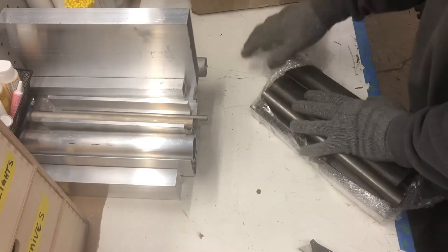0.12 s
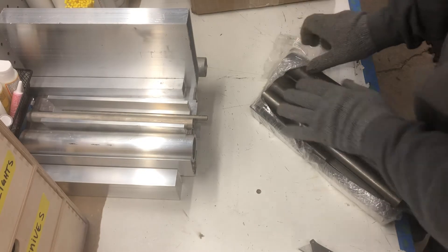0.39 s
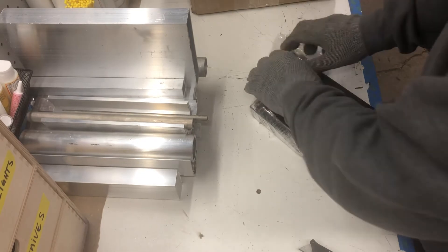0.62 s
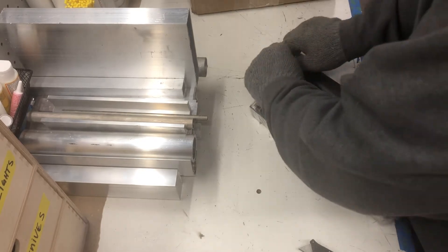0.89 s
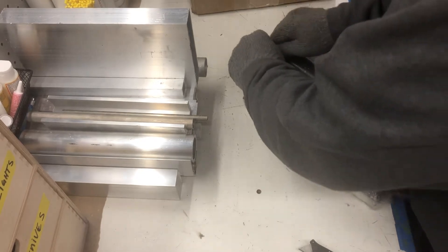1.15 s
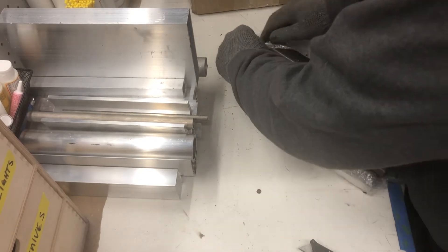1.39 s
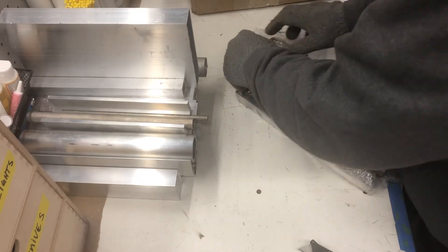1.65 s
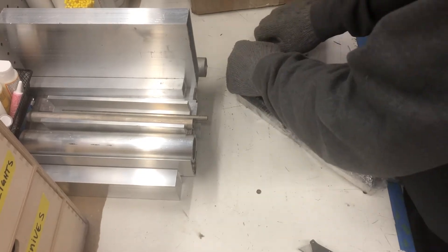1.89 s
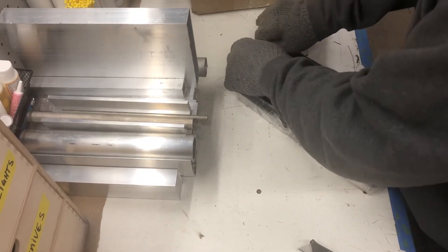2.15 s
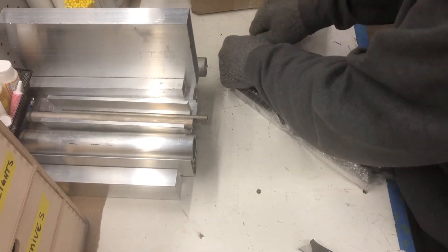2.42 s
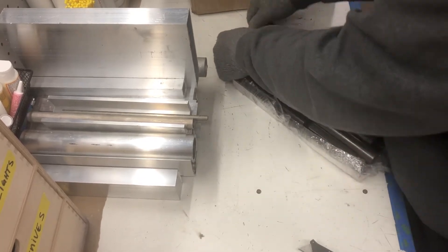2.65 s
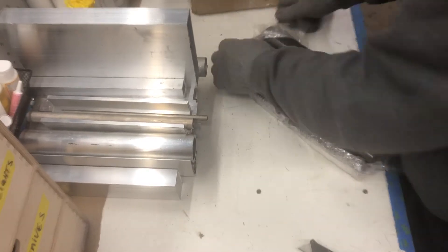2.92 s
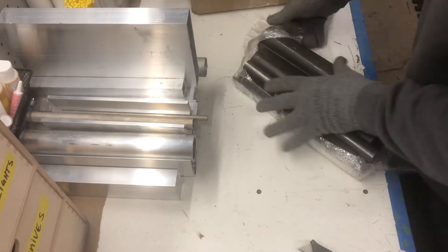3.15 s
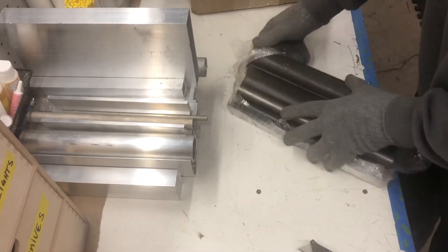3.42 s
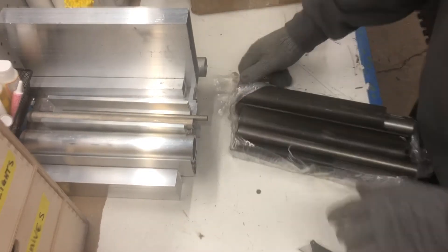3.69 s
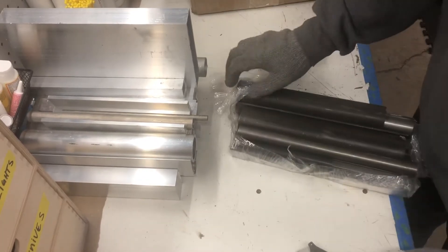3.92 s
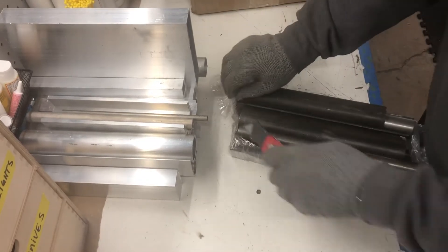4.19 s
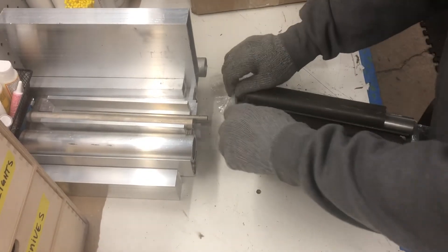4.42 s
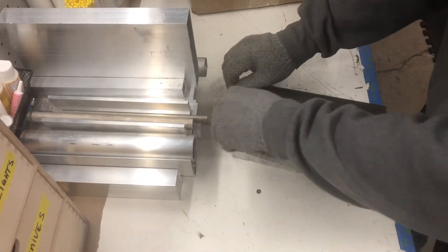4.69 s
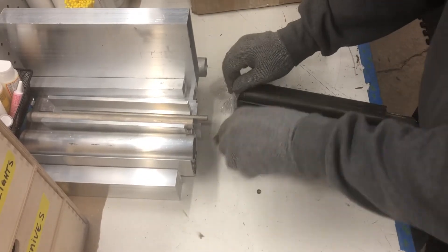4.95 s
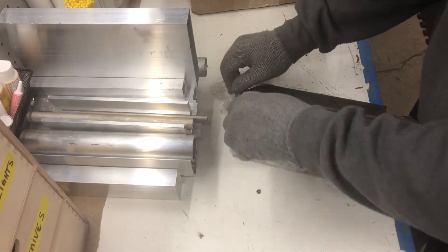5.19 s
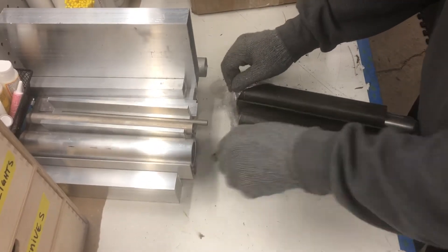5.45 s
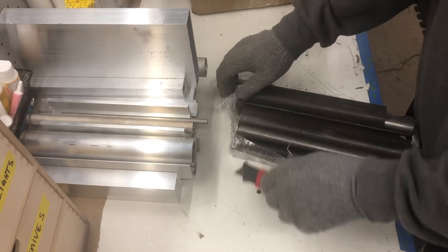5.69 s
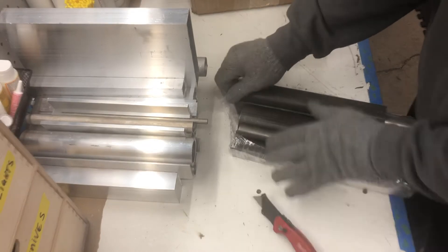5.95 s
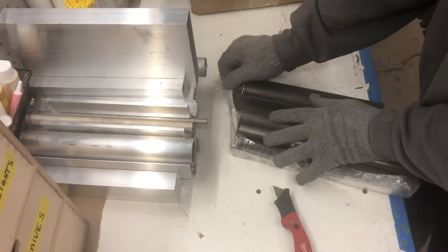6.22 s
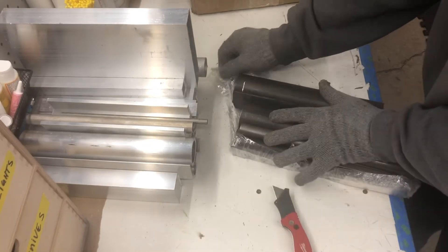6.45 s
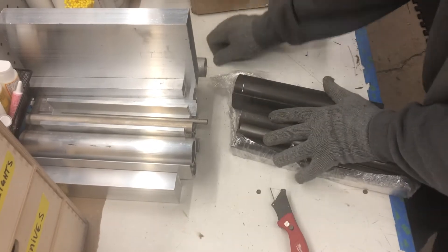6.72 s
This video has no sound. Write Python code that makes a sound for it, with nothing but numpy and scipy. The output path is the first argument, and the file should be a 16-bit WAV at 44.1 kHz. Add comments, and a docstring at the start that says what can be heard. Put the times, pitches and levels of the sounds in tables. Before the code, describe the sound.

Film is tugged in bursts of dry crackle, with ticks and hollow pops from the tubes and knocks on the bench top. After a big snap and a heavy thump, the load slides and judders. A blade scrapes loudly, the knife lands and bounces, then crisp high crackling resumes. Close, thin-sounding small microphone in a small workshop with low background noise.

```python
"""Hands pull stretch wrap off a bundle of steel tubes on a workbench: film crackle and snaps from filtered noise.
Throughout, bumps and slides ring the bench top, and resonant noise and pops stand for the air in the tubes.
Early on a knock rings a held tube; halfway, the bundle is dragged round with a climbing rough resonance.
Then a knife scrapes the steel, brushes a tube, drops, bounces and rocks on the bench with clicks and thuds.
Bright film snaps and rattling tube ends finish it, over a short echo and the low noise of the shop."""
import sys
import numpy as np
from scipy import signal
from scipy.fft import rfft, irfft
from scipy.io import wavfile
from scipy.ndimage import uniform_filter1d

SR = 44100
rng = np.random.default_rng(int(sys.argv[2]) if len(sys.argv) > 2 else 0)


def wav_out(sig):
    """Save sig, one row per channel (or a flat mono array), as 16-bit PCM at SR to the path in sys.argv[1]."""
    wavfile.write(sys.argv[1], SR, np.round(np.clip(np.atleast_2d(sig).T, -1, 1) * 32767).astype(np.int16))


def invert_db(x):
    """Field ratio 10**(x/20) for x, a level in decibels (scalar or array-like)."""
    u = np.asarray(x, float) / 20
    return 10 ** u


N = 301644
T = np.arange(N) / SR

# tugs at the film; the one at 5.949 is mostly the low ring of the knife's blows:
# (full strength at t/s, swell/s, hold/s, crackle level/dB, tube air level/dB)
TUGS = [(0.135, 0.018, 0.16, -47, -56), (0.306, 0.035, 0.067, -50, -50.5), (0.675, 0.013, 0.53, -44, -51),
        (1.32, 0.13, 0.02, -45.5, -49.5), (1.396, 0.045, 0.16, -47, -52.5), (1.958, 0.13, 0.2, -43, -50.5),
        (2.275, 0.11, 0.071, -40.5, -48.5), (2.58, 0.45, 0.051, -44.5, -62),
        (2.864, 0.15, 0.041, -39, -46.5), (3.122, 0.031, 0.054, -48, -48.5),
        (3.323, 0.38, 0.23, -47, -55.5), (3.659, 0.13, 0.14, -48.5, -74), (4.209, 0.022, 0.11, -49.5, -56),
        (4.476, 0.0095, 0.073, -51, -63), (4.602, 0.079, 0.02, -38, -45),
        (4.818, 0.014, 0.011, -37.5, -43.5), (4.919, 0.019, 0.0073, -40.5, -39.5),
        (5.425, .03, 0.2, -48, -48), (5.949, 0.076, 0.15, -51.5, -37.5), (6.14, 0.14, 0.16, -41.5, -52),
        (6.36, 0.076, 0.019, -35.5, -36.5), (6.458, 0.035, 0.024, -47.5, -52),
        (6.652, 0.19, 0.0047, -37, -41)]
# the film creeping between tugs: (t/s, crackle level/dB)
CREEP = [(0, -50.5), (.6, -56.5), (1.7, -54.5), (2.7, -50.5), (3.8, -58), (4.4, -63), (4.75, -50.5),
         (5.2, -62), (5.7, -52.5), (6.45, -51), (6.84, -63)]
# modes of the bench top: (f/Hz, level/dB, t60/s)
BENCH_MODES = [(103.4, -5, 0.074), (153, -4.5, 0.071), (209.4, -3.5, 0.11), (268, -6, 0.1),
               (374, 3.5, 0.059), (439.7, 0, 0.059), (549, -14.5, 0.18), (786, 5, 0.03),
               (1070, -2.5, 0.047)]


def noise():
    """White noise for the whole scene."""
    return rng.standard_normal(N)


def unit(x):
    """Scales a signal to an rms of 1."""
    return x / np.sqrt(np.mean(x ** 2))


def curve(table):
    """Draws straight lines through (t/s, value) points."""
    return np.interp(T, *np.transpose(table))


def colour(x, points, lo_hz=1, hi_hz=SR):
    """Shapes the spectrum along (f/Hz, level/dB) points, between two soft edges."""
    f = np.maximum(np.fft.rfftfreq(N, 1 / SR), 1)
    hz, db = np.transpose(points)
    edges = 1 / np.sqrt((1 + (lo_hz / f) ** 4) * (1 + (f / hi_hz) ** 4))
    tilt = invert_db(np.interp(np.log(f), np.log(hz), db))
    return irfft(rfft(x) * tilt * edges, N)


def ring(x, modes):
    """Decaying modes of alternate sign; a unit tap starts each at its own level."""
    out = 0
    for k, (hz, db, t60) in enumerate(modes):
        turn = 2j * np.pi * min(hz, SR / 2.2) / SR
        decay = np.log(1000) / (max(t60, .001) * SR)
        pole = np.exp(turn - decay)
        out = out + (-1) ** k * invert_db(db) * signal.lfilter([1], [1, -pole], x).imag
    return out


def walk(rate):
    """Random levels held 1 / rate s and slewed; spread 1."""
    k = max(int(SR / rate), 1)
    held = np.repeat(rng.standard_normal(N // 20 + 1), k)[:N]
    return unit(uniform_filter1d(held, k))


def add(out, s, x):
    """Mixes a short sound in at s seconds."""
    i = int(s * SR)
    out[i:i + len(x)] += x[:N - i]


def burst(rise_ms, t60, chance):
    """Noise that swells over the rise and then dies away; peak near 1."""
    t = T[:len(chance)]
    rise = 1 - np.exp(-t / max(rise_ms / 1000, 1e-5))
    shape = rise * np.exp(-np.log(1000) * t / max(t60, .002))
    return chance * shape / shape.max() / 1.86


def patch(chance, rise_ms, t60, hz, cycles):
    """A burst heard through a broad resonance; peak 1."""
    x = ring(burst(rise_ms, t60, chance), [(hz, 0, cycles / hz)])
    return x / np.abs(x).max()


def creases(per_s, spread_db, fade_ms):
    """Loudness of randomly timed buckles of uneven size, each dying within its fade time."""
    size = invert_db(spread_db * np.clip(noise(), -2.5, 2.5)) * (rng.random(N) < per_s / SR)
    return signal.lfilter([1], [1, -np.exp(-1000 / (fade_ms * SR))], size)


def add_push(out, s, db, ms):
    """A smooth shove that lasts as long as the contact."""
    contact = np.hanning(max(int(ms * SR / 1000), 3) + 2)
    add(out, s, invert_db(db) * contact / contact.sum())


def movements(rows, rest_db):
    """Level in dB of movements that swell, sag while held and are let go; their powers add to the rest level."""
    swell_db = 20  # how far a movement climbs during its swell time
    sag_db_per_s, release_db_per_s = 4.5, 212  # the release adds to the sag
    power = invert_db(rest_db) ** 2
    for s, swell, hold, db in rows:
        fall = swell_db * np.maximum(s - T, 0) / max(swell, .005)
        fall = fall + sag_db_per_s * np.maximum(T - s, 0)
        fall = fall + release_db_per_s * np.maximum(T - s - hold, 0)
        power = power + invert_db(db - fall) ** 2
    return 10 * np.log10(power)


def film():
    """Hundreds of creases buckle each second; some are heard in every band, others in one band alone."""
    # spectrum of the crackle: (f/Hz, level/dB per Hz)
    film_tone = [(200, -42), (700, -8), (1200, 1), (3900, -1), (7000, -4.5), (16000, -10)]
    # treble of the film against its body: (t/s, level/dB)
    treble = [(0, 0), (.6, -2.5), (1.4, 1), (2.0, -3.5), (3.1, 1.5), (4.4, 6.5), (4.65, 3), (5.1, -4),
              (5.8, 3), (6.2, 11.5), (6.45, -3), (6.7, 7.5)]
    level_db = movements([tug[:4] for tug in TUGS], curve(CREEP))
    bright_db = curve(treble)
    shared = unit(creases(120, 6, .5) * invert_db(3 * walk(14)))
    gusts = invert_db(2 * walk(18))
    bands = []
    # the last band is open at the top
    for lo_hz, hi_hz in ((200, 1230), (1200, 1370), (2200, 4000), (3800, 6440), (7000, 70000)):
        own = unit(creases(90, 6, .9))
        loud = .45 * shared + .75 * own + .75  # the constant is a steady rustle
        grain = noise() * loud * gusts * invert_db(0.52 * walk(9.2))
        bands.append(colour(grain, film_tone, lo_hz, hi_hz))
    body = sum(bands[:-1]) / np.std(sum(bands[1:-1]))  # levelled without the lowest band
    return invert_db(level_db) * (body + invert_db(bright_db) * unit(bands[-1]))


def snaps():
    """A crease lets go with a broad tick that also shakes the patch of film it frees."""
    # single creases letting go: (t/s, level/dB, pitch f/Hz)
    snap_rows = [(0.679, -30.5, 2200), (0.7284, -24.5, 2550), (0.7612, -30, 3990), (0.9883, -20.5, 2410),
                 (0.998, -20, 3900), (1.2913, -23, 3280), (1.3384, -25, 1590), (1.3625, -14, 1220),
                 (1.9735, -35, 1280), (2.2492, -22, 2160), (2.308, -17.5, 4000), (2.4339, -29, 1660),
                 (2.4997, -31.5, 1300), (2.5699, -6.5, 3300), (2.754, -20.5, 4400), (2.781, -22, 4200),
                 (2.815, -23, 4300), (2.828, -18, 3730), (2.8448, -21, 1570), (2.8636, -14, 2660),
                 (2.897, -19, 884), (3.0914, -27.5, 3570), (3.3715, -17, 5170), (3.9125, -22.5, 3420),
                 (3.9668, -23.5, 4900), (4.105, -28.5, 4580), (4.1814, -29, 4870), (4.2375, -27, 1690),
                 (4.382, -26, 7800), (4.4872, -25.5, 1900), (4.622, -16, 2830), (4.8245, -27.5, 1380),
                 (4.9216, -14.5, 1415), (5.017, -21.5, 2360), (6.1625, -12, 10100), (6.2235, -17, 6100),
                 (6.302, -16, 8000), (6.3768, -15, 1620), (6.5096, -19, 6440), (6.5795, -16, 8000),
                 (6.6455, -12, 10200), (6.6534, -8.5, 6500)]
    flap_cycles, flap_max_s = 39.5, .06  # t60 of the shaking: in cycles, and its upper limit
    tick_top = 4  # a tick dulls above this multiple of its pitch
    out = np.zeros(N)
    for (s, db, hz), chance in zip(snap_rows, rng.standard_normal((len(snap_rows), 2, 3000))):
        tick = burst(.05, .004, chance[0])
        dull = np.exp(-2 * np.pi * min(tick_top * hz, SR / 2) / SR)
        tick = signal.lfilter([np.sqrt(1 - dull ** 2)], [1, -dull], tick)
        flap = patch(chance[1], 0.1, min(flap_cycles / hz, flap_max_s), hz, 14)
        add(out, s, invert_db(db) * (0.58 * tick + 0.58 * flap))
    return out


def bench():
    """Bumps push the bench top into ringing; the sliding bundle shakes it with juddering noise."""
    # bumps on the bench top: the bundle's, and at 6.055 and 6.071 the dropped knife rocking:
    # (t/s, level/dB, contact/ms)
    bumps = [(0.159, -28, 9.2), (0.871, -17, 18), (1.331, -31.5, 3.2), (1.345, -16, 9.5),
             (1.466, -22, 10.4), (2.871, -9, 12.5), (3.693, -21, 7.1), (3.727, -27, 8.4), (3.835, -32, 5.4),
             (4.237, -29.5, 3.8), (4.623, -31, 4.5), (5.015, -34, 2.9), (5.79, -38, 1.6), (6.055, -25, 1.8),
             (6.071, -35, 1.1), (6.557, -36.5, 1.5), (6.651, -31, 1.7)]
    # the bundle sliding: (full strength at t/s, swell/s, hold/s, rumble level/dB)
    slides = [(.15, 0.065, 0.23, -55.5), (.8, 0.08, 1, -52.5), (1.35, 0.076, 0.15, -53),
              (2.5, 0.066, 0.2, -50.5), (2.89, 0.039, 0.012, -40), (3.4, 0.13, 0.023, -40),
              (3.62, 0.23, .12, -40), (3.86, 0.052, 0.092, -51), (4.92, .15, 0.13, -54),
              (5.25, 0.049, 0.2, -48), (5.41, 0.03, 0.11, -34.5), (5.98, 0.29, 0.24, -43),
              (6.2, 0.13, 0.28, -48), (6.57, 0.093, 0.17, -54)]
    push = np.zeros(N)
    for s, db, ms in bumps:
        add_push(push, s, db, ms)
    rumble_db = movements(slides, -67)  # the second figure is the bench at rest
    judder = invert_db(2.5 * walk(20))
    shaken = ring(noise() * judder, BENCH_MODES)
    rub = unit(colour(shaken, [(60, 15.0), (250, 0.0), (700, -4.0), (2000, -18)]))
    return ring(push, BENCH_MODES) + invert_db(rumble_db) * rub


def knife_scrape():
    """The blade catches on steel: each catch is a harsh rasp that drives ringing steel modes."""
    # catches: (t/s, level/dB, t60/s, rasp pitch f/Hz, blade ring level/dB)
    catches = [(5.2332, -10, 0.048, 2420, -14), (5.266, -20, 0.2, 7050, -22), (5.285, -20, 0.94, 3800, -33),
               (5.347, -12.5, 0.16, 2760, -15), (5.395, 6.5, 0.083, 3500, -34),
               (5.409, -2.5, 0.12, 4100, -22), (5.431, 4.5, 0.14, 5250, -33), (5.454, 3, 0.03, 2840, -5),
               (5.465, -5, 0.083, 8000, -12), (5.478, -1.5, 0.086, 7400, -2), (5.489, 1, 0.082, 3560, -34),
               (5.499, -0.5, 0.023, 3100, -27)]
    # modes of the blade: (f/Hz, level/dB, t60/s)
    blade_modes = [(1985, -19, .08), (2449, -16, .09), (2790, -14, .05), (3591, -16, .06), (4905, -15, .05),
                   (5370, -19, .04), (6430, -13, .05), (6967, -7, .07), (7768, -15, .045),
                   (10030, -18, .05), (13570, -13, .07)]
    rasp, drive = np.zeros(N), np.zeros(N)
    for (s, db, t60, hz, ring_db), chance in zip(catches, rng.standard_normal((len(catches), 3, 8000))):
        scratch = burst(0.43, t60, chance[0])
        pitched = patch(chance[2], 0.82, t60, hz, 5.0)
        add(rasp, s, invert_db(db) * (0.5 * scratch + 0.42 * pitched))
        add(drive, s, invert_db(db + ring_db) * burst(2.4, t60, chance[1]) / 10)
    grit = 0.75 + 0.28 * unit(creases(400, 6, 0.99))
    rough = rasp * invert_db(2.3 * walk(300)) * grit
    rasp = colour(rough, [(300, -3), (8000, -3.5), (16000, -4.0)], lo_hz=246)
    return rasp + ring(drive, blade_modes)


def knife_drop():
    """The knife lands and bounces: each blow clicks, rings the handle and thuds on the bench top."""
    # blows: (t/s, click level/dB, thud level/dB, contact/ms)
    blows = [(5.8507, -5, -14.5, 0.9), (5.8676, -15, -14, 2.44), (5.9515, -10.5, -16.5, 1),
             (5.9661, -12, -21.5, 0.46), (5.998, -29, -35, 0.96), (6.0363, -12.5, -25, 1.1)]
    # modes of the handle: (f/Hz, level/dB, t60/s)
    handle_modes = [(1470, 1, 0.0048), (2420, 6.5, 0.0014)]
    push, click = np.zeros(N), np.zeros(N)
    for (s, db, thud_db, ms), chance in zip(blows, rng.standard_normal((len(blows), 2000))):
        add_push(push, s + 0.00225, thud_db, ms)  # the heavy top answers just after the click
        add(click, s, invert_db(db) * burst(0.08, 0.027, chance))
    return ring(push, BENCH_MODES) + .5 * click + invert_db(-12.5) * ring(click, handle_modes)


def drag():
    """Stick-slip grains in a narrow band whose resonance climbs while the bundle is dragged round."""
    # path of the resonance: (t/s, f/Hz, level/dB)
    path = [(3.33, 298, -50.5), (3.40, 395, -47), (3.47, 720, -46.5), (3.6, 753, -46.5), (3.679, 685, -60)]
    s, hz, db = np.transpose(path)
    stick_slip = noise() * (1 + unit(creases(150, 5, 3)))
    grains = unit(uniform_filter1d(stick_slip, size=300))
    phase = 2 * np.pi * np.cumsum(np.interp(T, s, hz)) / SR
    return invert_db(np.interp(T, s, db, -120, -120)) * grains * np.cos(phase)


def tube_air():
    """Air columns hum with the tugs and pop when film slaps a tube mouth; the knife's low ring shares the hum."""
    # film slapping over a tube mouth: (t/s, level/dB)
    puffs = [(0.909, -30), (1.447, -34), (1.558, -33.5), (1.908, -36.5), (1.975, -33), (2.017, -29),
             (2.251, -32.5), (2.292, -31), (2.574, -26), (2.896, -28), (2.943, -26.5), (3.32, -31),
             (3.757, -37.5), (4.923, -19.5)]
    # resonances of the air columns: (f/Hz, width/Hz, level/dB)
    air_columns = [(347, 143, -1.5), (500, 93, 3.5), (944, 170, -2.5)]
    puff = np.zeros(N)
    for s, db in puffs:
        add_push(puff, s, db, 1.0)
    air_db = movements([tug[:3] + tug[4:] for tug in TUGS], curve(CREEP) - 7)
    modes = [(hz, db, 2.55 / width) for hz, width, db in air_columns]
    flutter = invert_db(4 * walk(35))
    return invert_db(air_db) * unit(ring(noise() * flutter, modes)) + ring(puff, modes)


def tube_taps():
    """A knock rings a gripped tube, whose modes die early; later the knife brushes a free one."""
    # modes of a free tube: (f/Hz, level/dB, t60/s)
    tube_modes = [(630, 0, .24), (791, -4, .35), (1071, -4, .27), (1136, -5, .6)]
    knock, brush = np.zeros(N), np.zeros(N)
    add(knock, 1.3635, invert_db([-23.5]))
    add(brush, 5.544, invert_db(-33) * burst(3, .025, rng.standard_normal(SR // 10)) / 10)
    held_share = 0.14  # share of the free ring time left by the grip
    held_modes = [(hz, db, held_share * t60) for hz, db, t60 in tube_modes[2:]]
    return ring(knock, held_modes) + ring(brush, tube_modes)


def clinks():
    """Two tube ends touch: short rattling contacts that ring them."""
    # contacts: (t/s, level/dB)
    touches = [(6.482, -35.5), (6.57, -40), (6.716, -43), (6.834, -37)]
    # modes of a tube end: (f/Hz, level/dB, t60/s)
    end_modes = [(1660, 1, 0.026), (2160, 5, 0.051)]
    touch = np.zeros(N)
    for (s, db), chance in zip(touches, rng.standard_normal((len(touches), 1500))):
        add(touch, s, invert_db(db) * burst(1.9, 0.072, chance) / 10)
    return ring(touch, end_modes)


def room_echo(near):
    """A short workshop echo: decaying noise as the room's response, after a 3 ms gap."""
    t60_s, top_hz = .2, 7640
    t = T[:SR // 2]
    tail = rng.standard_normal(SR // 2) * np.exp(-np.log(1000) * t / t60_s) * (t > .003)
    echo = signal.fftconvolve(near, unit(tail) / np.sqrt(len(tail)))[:N]
    return invert_db(-10) * colour(echo, [(100, 0), (1000, 0.0)], hi_hz=top_hz)


def shop():
    """The quiet shop: steady noise, strongest in the bass."""
    # spectrum of the background: (f/Hz, level/dB per Hz)
    shop_tone = [(40, 0.5), (100, 7.5), (500, -19), (1500, -36), (6000, -64), (16000, -43)]
    return invert_db(-62) * unit(colour(noise(), shop_tone))


def scene():
    """Everything near the microphone, with its echo and the shop behind it."""
    near = film() + snaps() + bench() + knife_scrape() + knife_drop()
    near = near + drag() + tube_air() + tube_taps() + clinks()
    return (near + room_echo(near) + shop())[None]


def roll_off(x):
    """The treble ends steeply here."""
    return signal.sosfilt(signal.butter(12, 16810, fs=SR, output="sos"), x)


def record(dry):
    """A small microphone with little deep bass that rounds the loudest peaks and cuts the top."""
    bass_cut = signal.butter(4, 82, "high", fs=SR, output="sos")
    top_cut = signal.ellip(8, .2, 45, 15750, fs=SR, output="sos")
    thin = signal.sosfilt(bass_cut, dry)
    rounded = np.tanh(thin)
    return roll_off(signal.sosfilt(top_cut, rounded))


dry = scene()
out = record(dry)
wav_out(out)
```